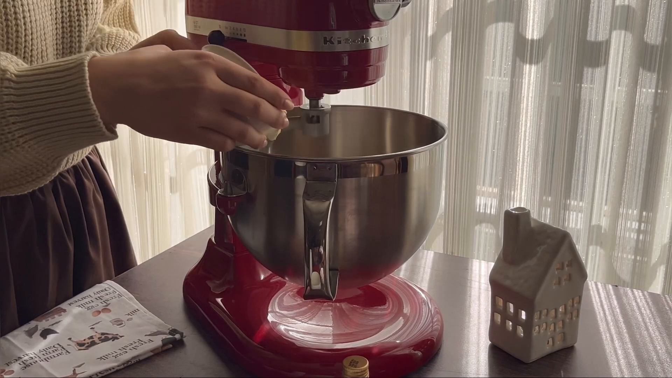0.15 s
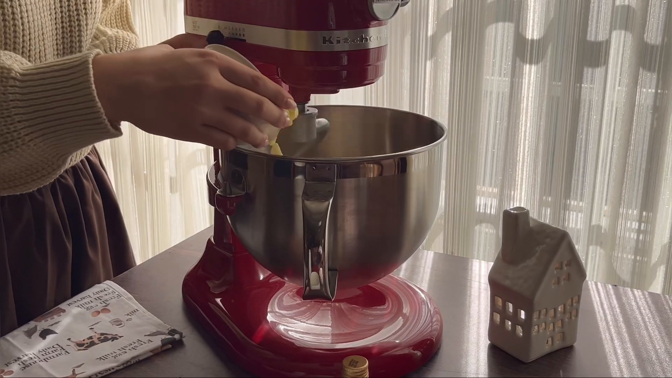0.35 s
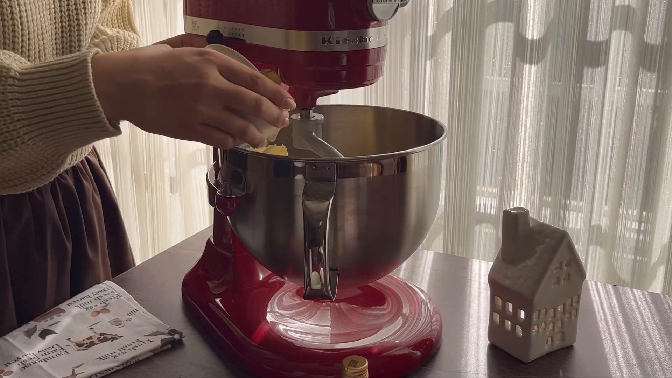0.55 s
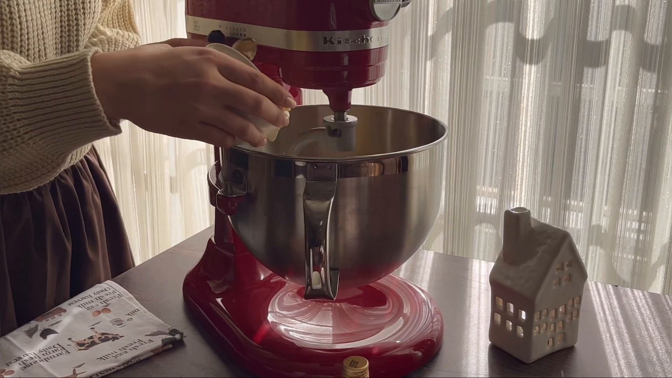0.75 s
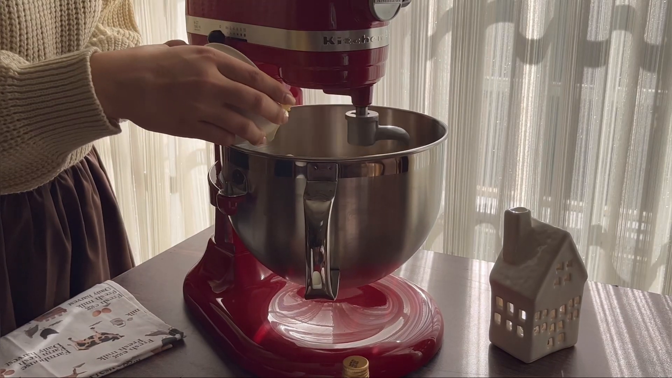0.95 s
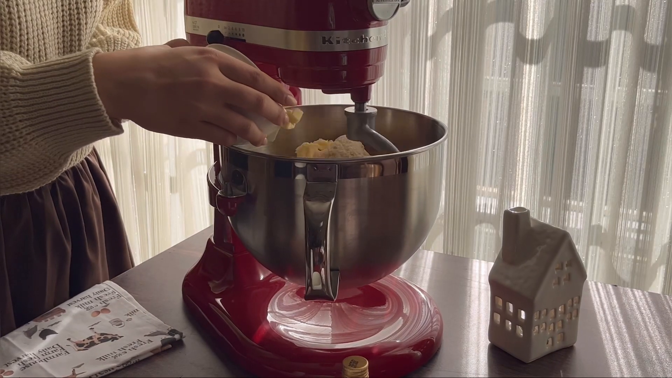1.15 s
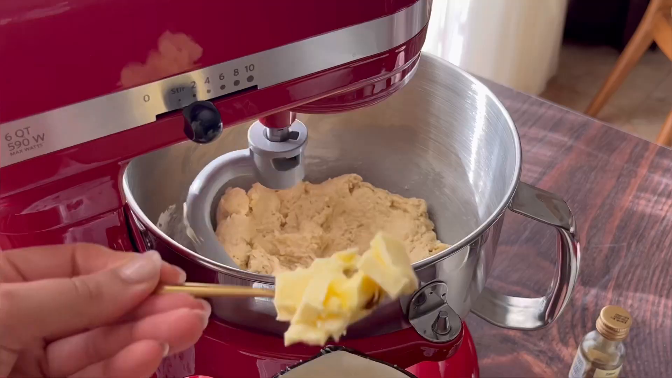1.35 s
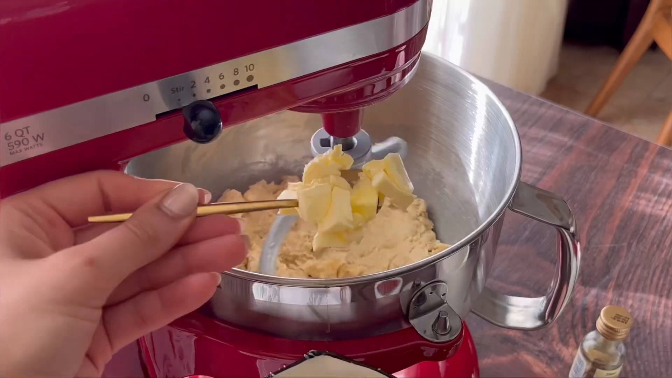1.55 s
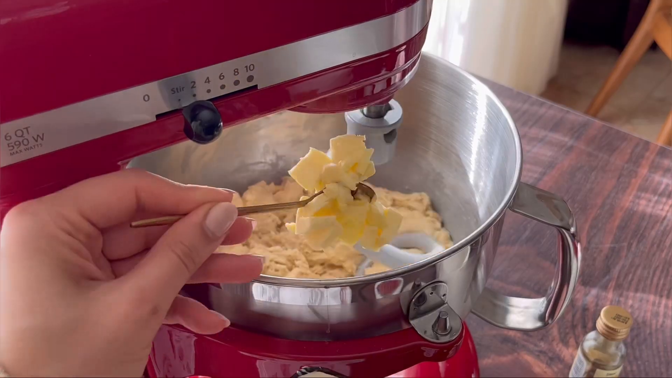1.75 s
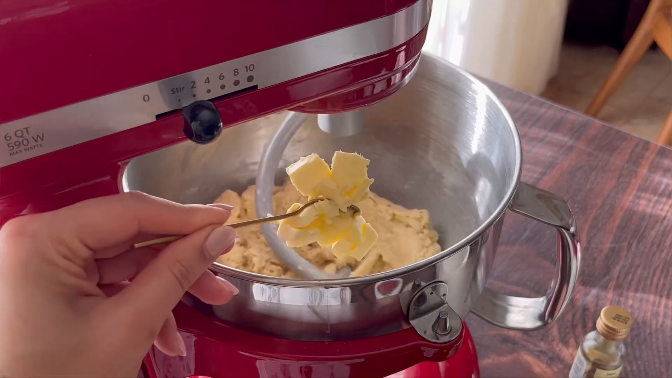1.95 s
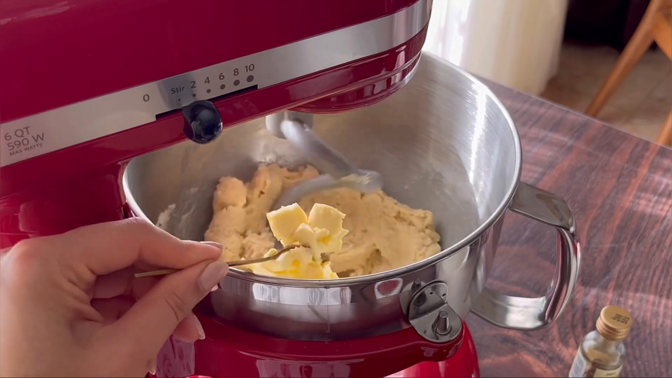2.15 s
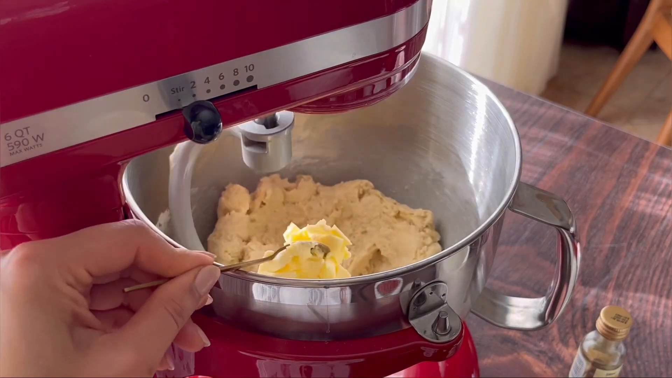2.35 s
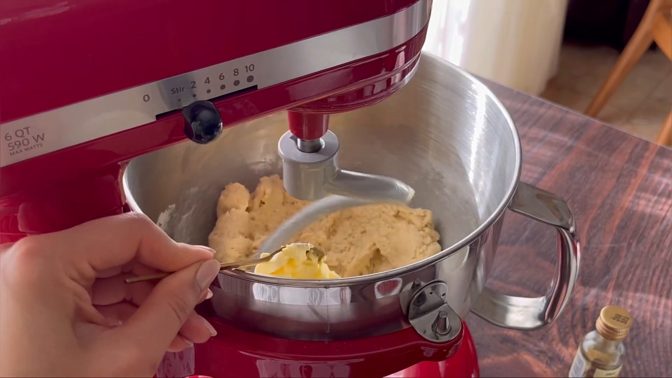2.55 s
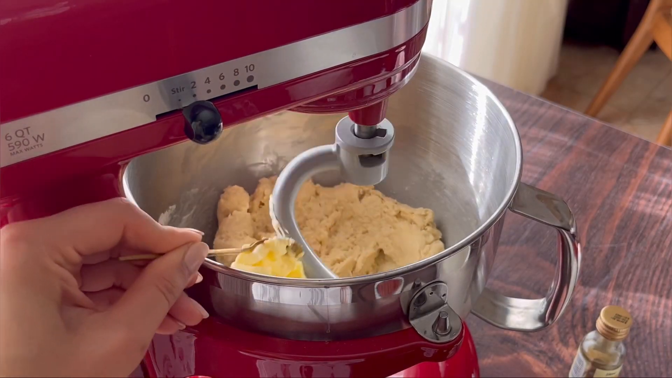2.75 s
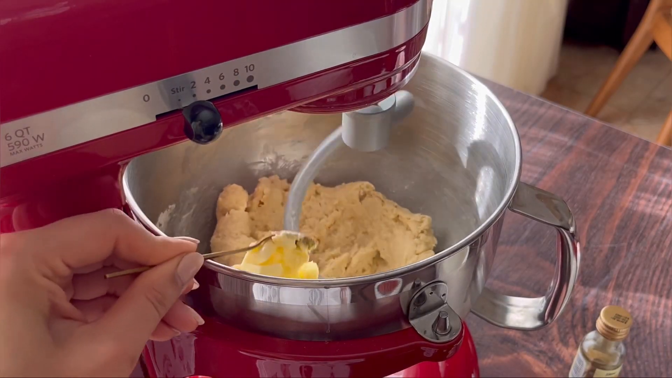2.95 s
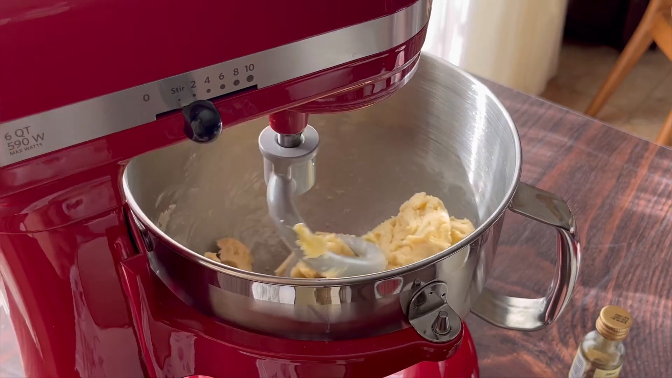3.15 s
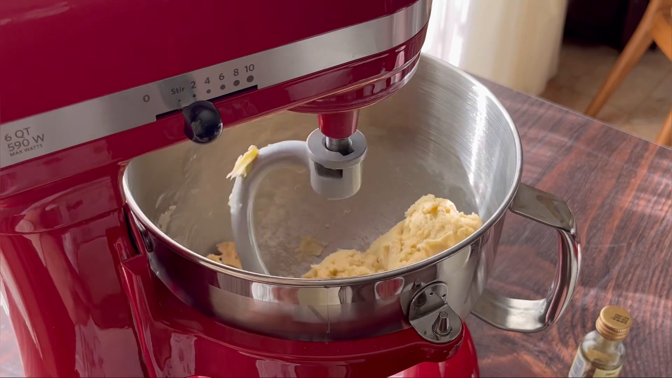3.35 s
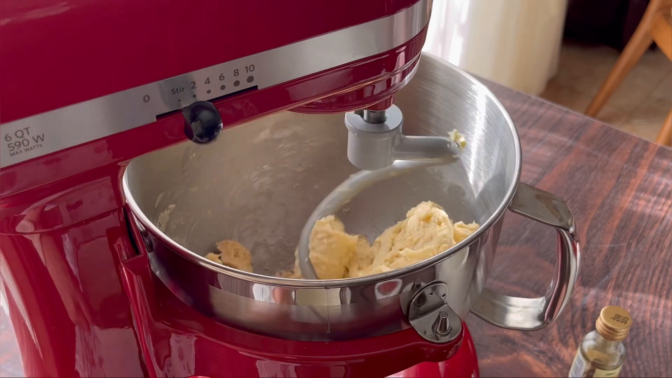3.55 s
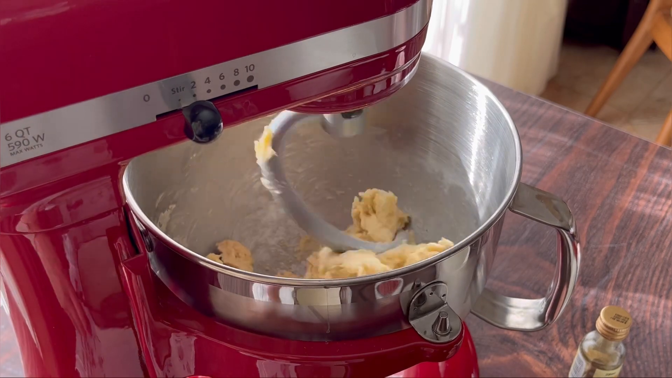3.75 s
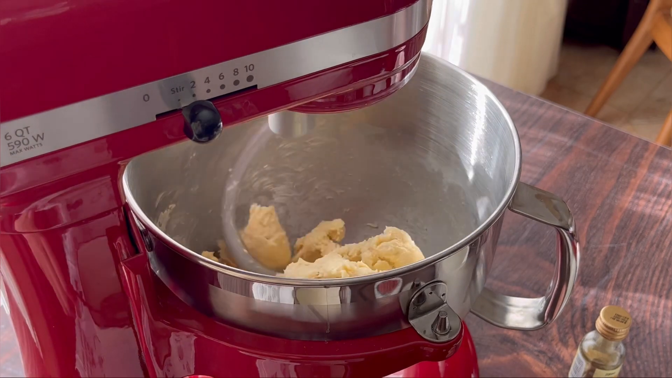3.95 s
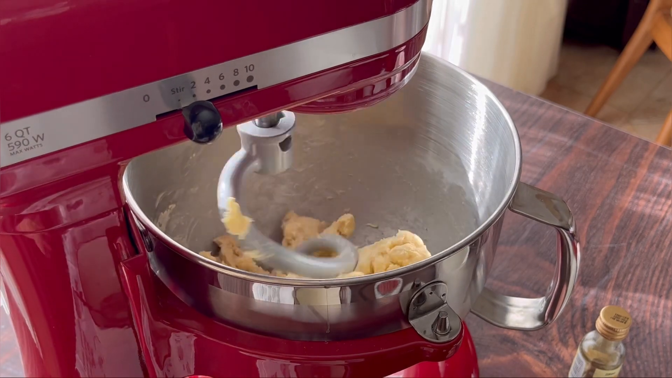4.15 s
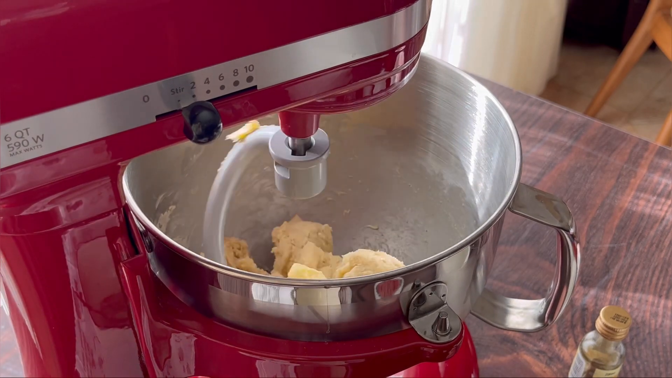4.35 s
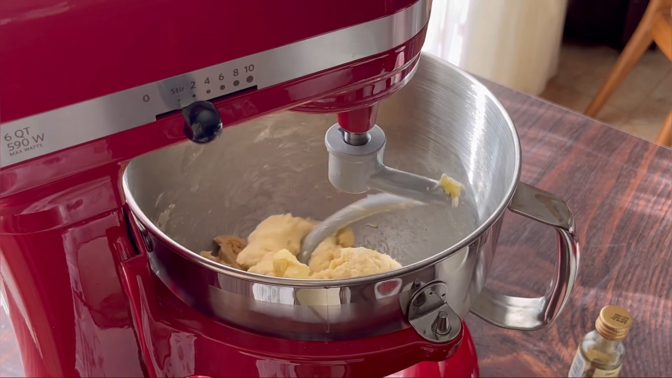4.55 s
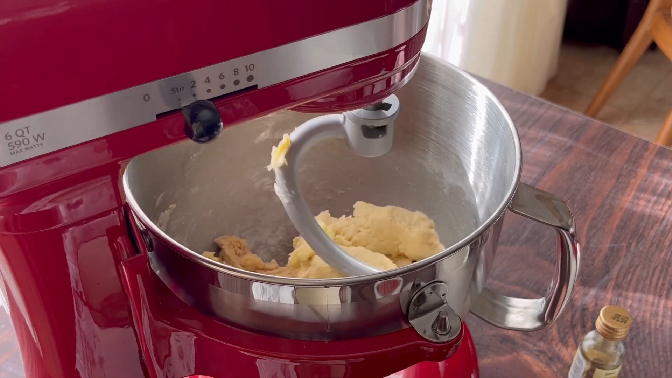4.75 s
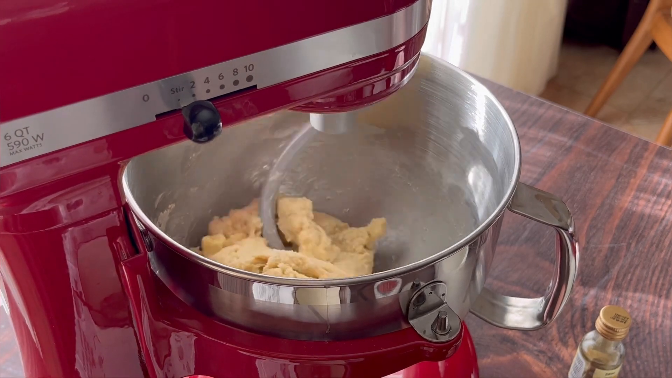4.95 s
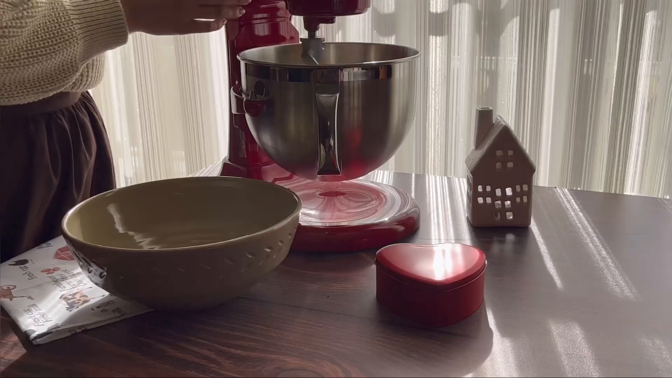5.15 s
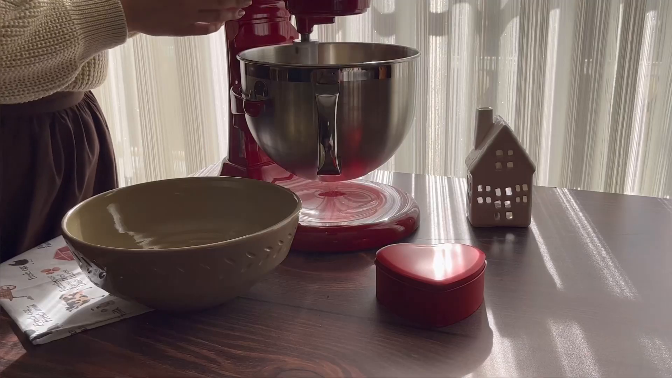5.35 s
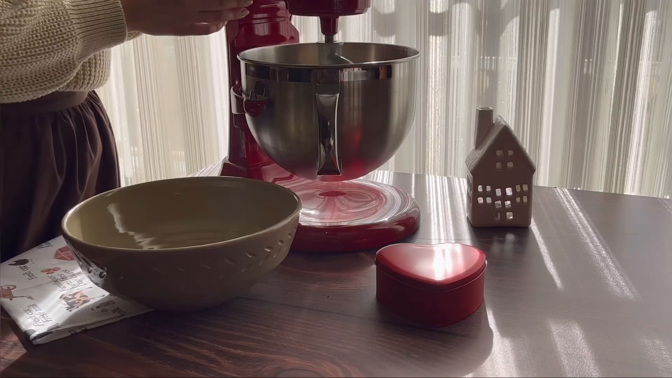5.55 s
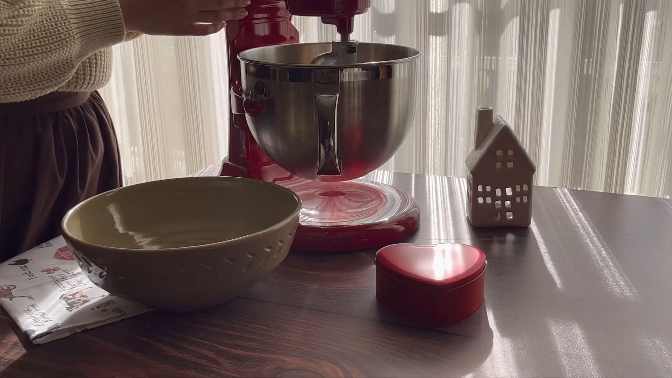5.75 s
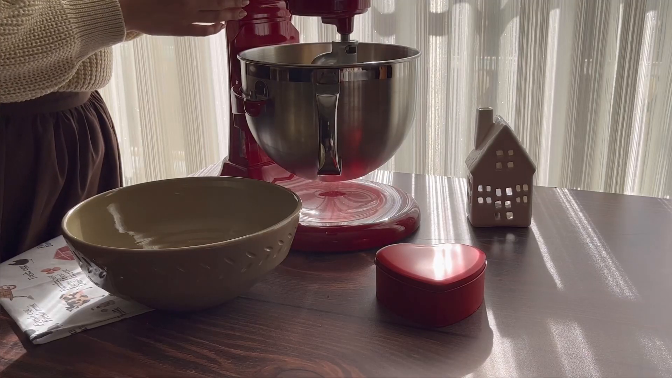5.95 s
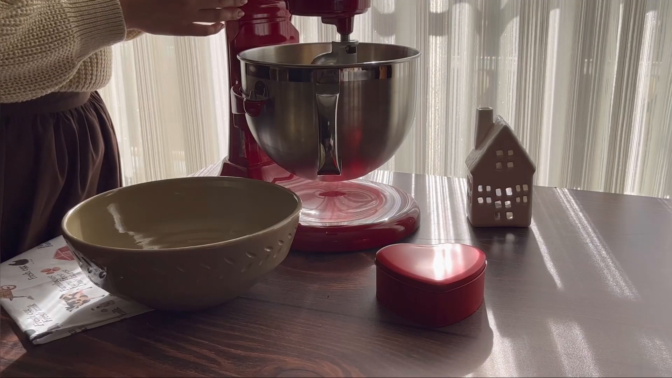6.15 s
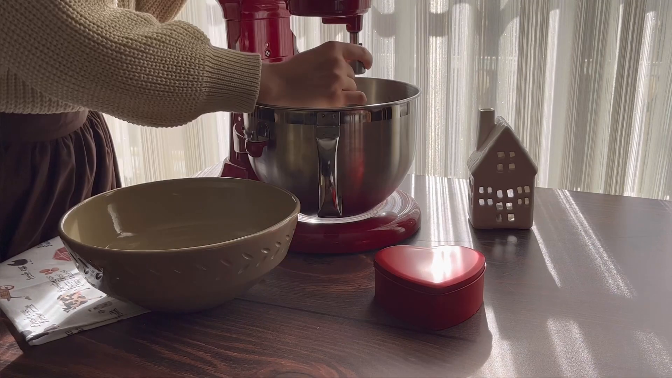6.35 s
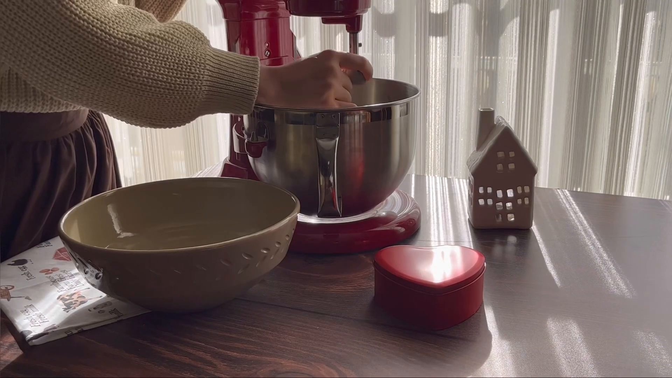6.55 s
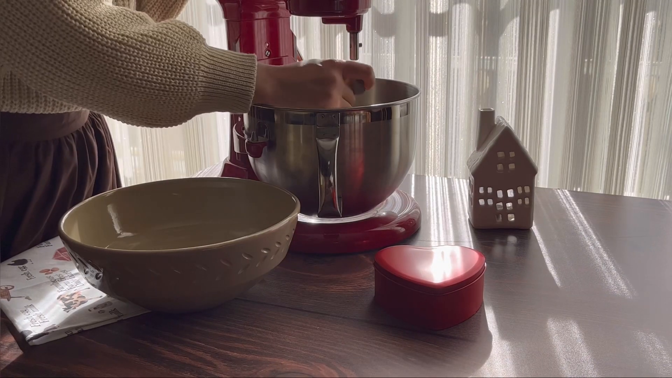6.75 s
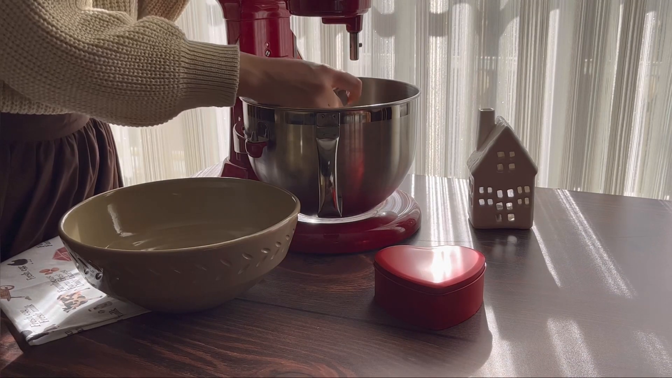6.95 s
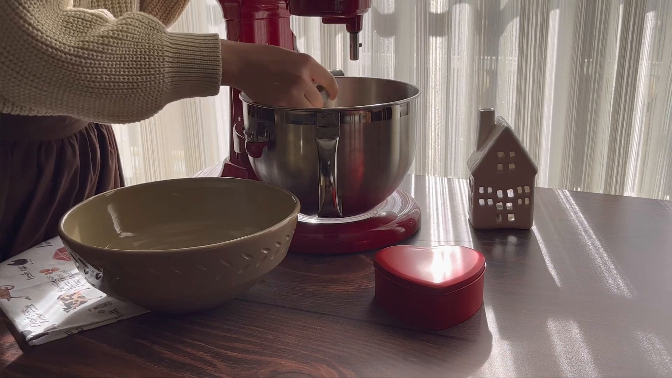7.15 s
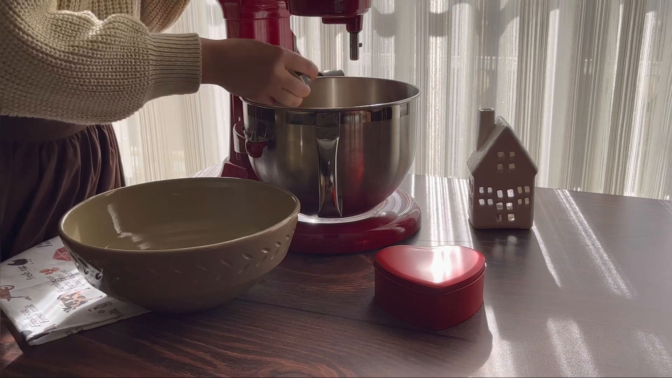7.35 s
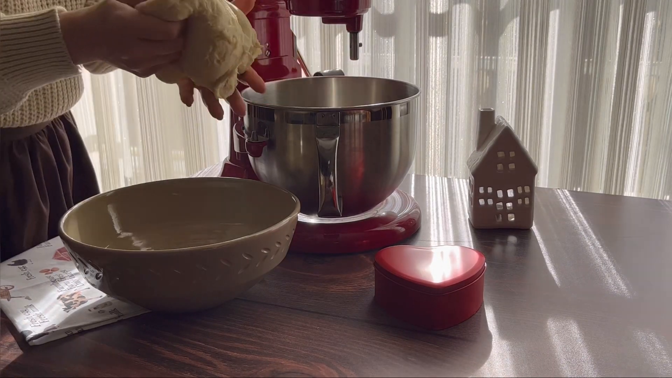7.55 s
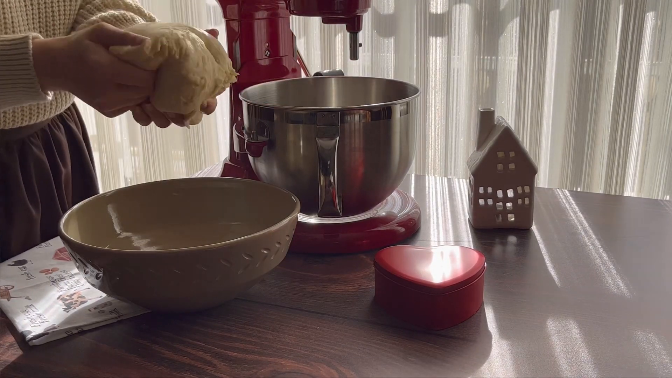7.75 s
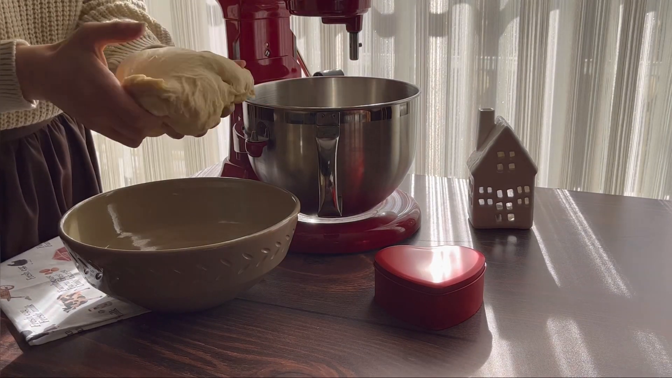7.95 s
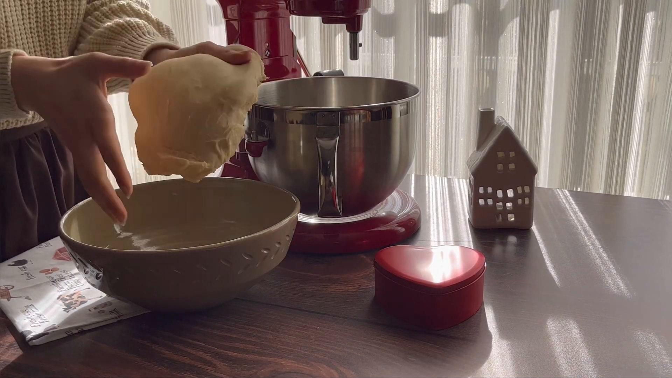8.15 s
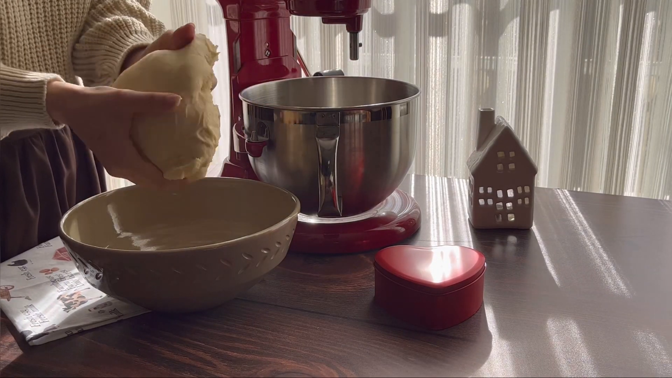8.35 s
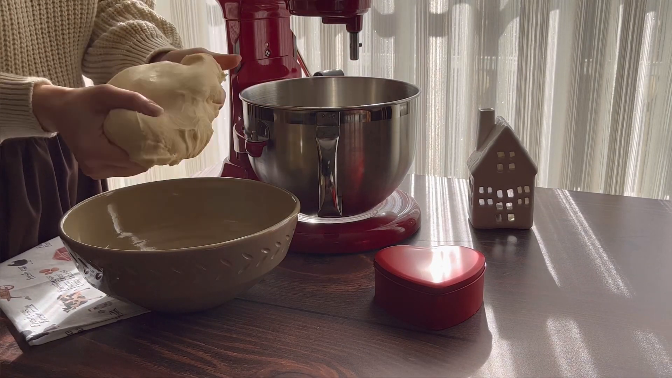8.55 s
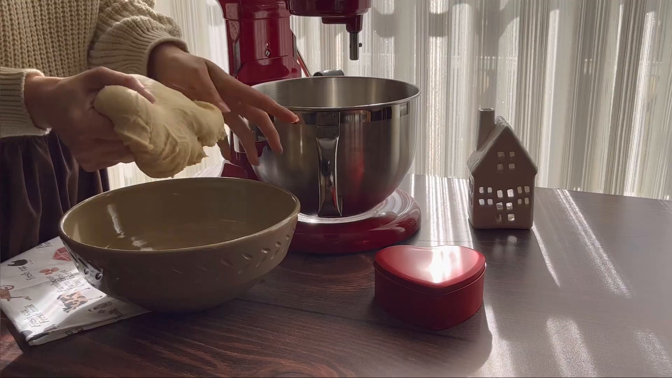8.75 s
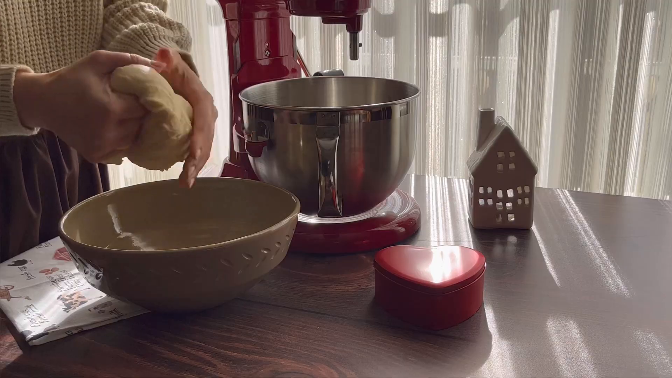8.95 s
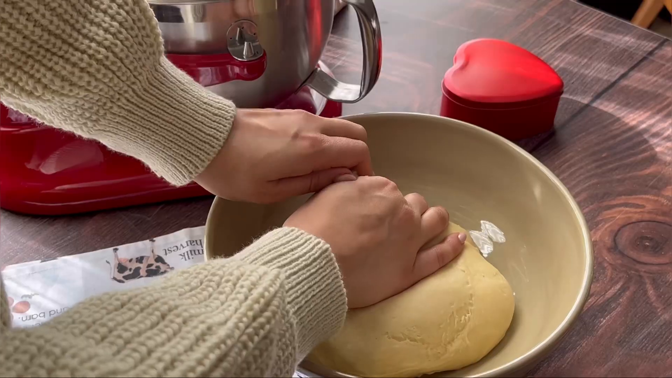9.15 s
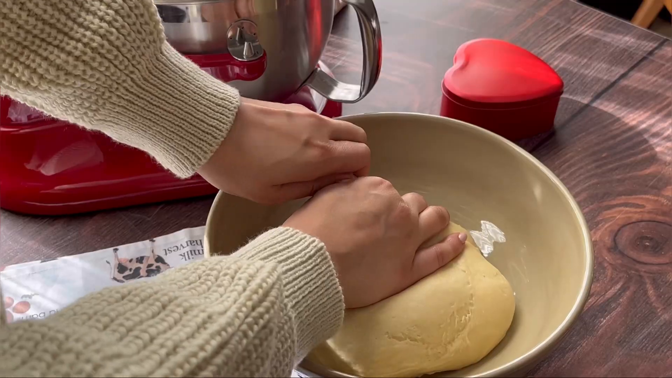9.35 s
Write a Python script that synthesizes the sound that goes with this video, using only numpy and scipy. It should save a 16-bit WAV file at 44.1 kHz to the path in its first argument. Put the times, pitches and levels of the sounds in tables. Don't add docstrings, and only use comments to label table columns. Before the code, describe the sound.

Gear growl of a kneading mixer sags and swells, metal taps ring briefly, a sharp switch snap stops it, then faint sticky dough.

```python
import sys
import numpy as np
from scipy import signal
from scipy.fft import rfft, irfft, next_fast_len
from scipy.io import wavfile
from scipy.ndimage import uniform_filter1d

SR = 44100
rng = np.random.default_rng(int(sys.argv[2]) if len(sys.argv) > 2 else 0)


def int16_out(signal):
    q = np.round(np.clip(np.atleast_2d(signal).T, -1, 1) * 32767)
    wavfile.write(sys.argv[1], SR, q.astype(np.int16))


def nominal_scale(level):
    x = np.asarray(level, float) / 20
    return 10 ** x


N = 414094
T = np.arange(N) / SR
PADDED = next_fast_len(N + SR)
HZ = np.maximum(np.arange(PADDED // 2 + 1) * SR / PADDED, 1)

# start in s, housing, gear noise, brush noise and air noise in dB.
POSITIONS = [
    (0, -44.5, -45.5, -55.5, -59.5),
    (1.36, -34, -46.5, -50, -54.5),
    (3.143, -35, -45.5, -50, -56),
    (5.0, -38, -41, -51.5, -57.5),
]
# field hum in dB, table drone in dB, left minus right in dB, table rumble in dB.
POSITION_LEVELS = [(-54.5, -49.5, 0.5, -56.5), (-38, -55.5, 2, -58.5), (-40, -53.5, 2, -59),
                   (-40, -50, 0, -52.5)]
FREE_MESH_HZ = [523, 530, 552, 548]
# middle in s, sag of the mesh in Hz (negative: it speeds
# up), length in s.
KNEADS = [(.33, 114, .5), (.92, 65, .3), (1.1, 25, .3), (1.26, 55, .22), (1.46, -30, .14), (1.58, 22, .16),
          (1.89, 30, .14), (2.13, 65, .22), (2.25, 20, .1), (2.52, -25, .2), (2.81, 62, .22),
          (3.3, 158, .36), (3.84, 105, .16), (4.13, -60, .26), (4.3, 165, .17), (4.41, 125, .17),
          (4.6, 36, .36), (4.9, 100, .18), (5.04, 148, .24), (5.3, 30, .16), (5.48, 60, .26), (.03, 55, .3),
          (.52, 55, .34), (3.64, -28, .22), (3.94, 45, .2), (4.78, 22, .22)]
# housing strain in dB, treble hush in dB.
KNEAD_STRAIN = [(-4.5, 7.5), (-3.5, 7.5), (6, 10), (9, 2.5), (4.5, -2), (-0.5, -2), (-1.5, 0.5), (-0.5, 4),
                (2.5, -1.5), (-1.5, -2.5), (0.5, 0), (4.5, 3.5), (2, 2), (-0.5, -1), (2.5, 5.5), (0.5, 1.5),
                (-1, 0), (3.5, -1.5), (5.5, 2.5), (-1, 1), (0.5, 0.5), (-5, 4), (5.5, 1), (-1.8, -1.5),
                (-0.5, -2), (0.2, 1.15)]
# frequency in Hz, density in dB per Hz.
MOTOR_HISS = [(20, -41), (50, -24.5), (160, -37), (330, -14), (420, -4.5), (560, -6.5), (730, -22),
              (1050, -19.5), (2240, -28), (3300, -33.5), (5900, -38.5), (9000, -35), (13000, -41.5)]
# frequency in Hz, width in Hz, lift in dB.
HOUSING_MODES = [(419, 48, 8), (495, 140, 7), (795, 86, 7), (1019, 60, 7), (1230, 50, 2.5), (1352, 85, 9),
                 (1496, 60, 6.5), (1795, 110, 8), (2920, 120, 2.5), (3850, 110, 6), (4450, 520, 7.5),
                 (4950, 200, 6), (5428, 300, 1)]
# multiple of the mesh frequency, level in dB. The 0.84 row is a
MESH_ORDERS = [(.84, -15), (1, -2.5), (1.32, -18.5), (1.6, -18), (2, -10), (2.5, -21), (3, -19), (4, -23)]
# multiple of the mesh frequency, level in dB.
SLOT_ORDERS = [(10, -5), (11, -3.5), (11.5, -12), (12, -2.5), (13, -2), (14, -10.5)]
# start in s, end in s, level over the brush noise in dB.
WHINES = [(.06, .18, -10), (.5, .9, -6), (1.74, 2.33, -5), (2.33, 3.25, -12), (3.38, 4.2, -8),
          (4.42, 5.0, -7), (5.08, 5.28, -8), (5.5, 5.7, -8)]
# time in s, frequency in Hz, level in dB.
GROAN = [(.62, 442.6, -83), (.7, 422.6, -42.5), (.88, 350, -48.5), (1.0, 330, -52), (1.15, 300, -50),
         (1.33, 290, -47), (1.36, 281, -72)]
# time in s, level in dB, decay time t60 in s.
BACKLASH = [(.5, -52, 0.026), (1.5, -44.5, 0.9), (3.465, -32, 0.03), (4.07, -30.5, 0.19),
            (4.122, -31, 0.066), (4.454, -40, 0.035), (2.099, -38.5, .09), (2.791, -41.5, .08),
            (4.901, -37.5, .07)]
# time in s, level in dB.
SHUDDER = [(0, -57), (.15, -47), (.4, -49), (.6, -56), (.8, -89)]
# start in s, end in s, first Hz, last Hz, level in dB.
MOANS = [(.37, .71, 262, 268, -49), (.3, .45, 655, 705, -41), (.07, .2, 660, 690, -46),
         (1.03, 1.22, 445, 418, -40), (.14, .31, 930, 800, -44), (.28, .43, 795, 812, -44),
         (.14, .3, 465, 385, -36), (.48, .76, 455, 540, -37), (.2, .47, 490, 522, -40),
         (.63, .83, 405, 432, -38), (.8, 1.03, 420, 378, -41), (.98, 1.21, 522, 490, -39),
         (1.23, 1.38, 418, 452, -38), (.78, 1.02, 352, 328, -45), (0, .15, 420, 475, -39),
         (2.27, 2.57, 437, 456, -38), (.45, .71, 575, 642, -47), (4.21, 4.32, 465, 388, -33),
         (4.83, 4.96, 430, 470, -34)]
# middle in s, first Hz, last Hz, level in dB, length in s.
FLARES = [(.19, 1340, 1340, -42.5, 0.08), (.62, 990, 990, -55, 0.13), (0.781, 1030, 1020, -54, 0.11),
          (1.56, 1520, 1530, -45, 0.084), (1.69, 1740, 1710, -49, .07), (2.118, 1410, 1414, -44.5, 0.076),
          (2.12, 1870, 1830, -44, .08), (2.54, 1780, 1766, -47, 0.11), (2.53, 1520, 1536, -45, 0.071),
          (2.81, 1830, 1890, -49, .09), (2.821, 1405, 1420, -49, .09), (3.25, 809, 767, -35, 0.074),
          (3.4, 1285, 1370, -45, .07), (3.41, 1800, 1870, -50, 0.054), (3.623, 1720, 1720, -43, 0.065),
          (3.791, 1053, 1020, -43.5, 0.059), (3.97, 1057, 1075, -42, 0.065),
          (4.087, 1004, 1023, -41, 0.074), (4.16, 1810, 1776, -43.5, 0.12), (4.146, 1230, 1230, -44, 0.047),
          (4.242, 1044, 1036, -45, 0.054), (4.297, 775, 740, -40, .08), (4.39, 820, 833, -39.5, 0.075),
          (4.446, 1114, 1100, -42, 0.059), (4.57, 1503, 1510, -43.5, 0.055), (4.81, 1530, 1507, -45, 0.076),
          (4.934, 1920, 1880, -44, .06), (5.05, 781, 828, -40.5, .12), (5.241, 1050, 1063, -47, 0.17),
          (5.397, 1747, 1726, -45.5, 0.15), (5.52, 1720, 1728, -45.5, 0.077), (3.47, 512, 540, -31, .05),
          (1.97, 1020, 1065, -42, .2), (2.36, 1050, 1060, -42, .2), (2.47, 845, 860, -46, .2),
          (1.95, 525, 535, -36, .12), (2.42, 540, 545, -35, .1), (2.53, 555, 560, -35, .1)]
# time in s, peak, low ring, top ring and second mode in dB.
TAPS = [
    (0.932, -38, -2.5, -5.5, 7.5),
    (2.3287, -18, -13.5, -15, 1),
    (2.527, -17.5, -12, -13, -6.5),
    (2.6881, -18, -8.5, -8.5, 0),
    (2.8834, -19, -16.5, -17, -2),
    (3.051, -15.5, -19.5, -18, -2.5),
    (3.58, -37, -8.5, -5, 0),
]
# frequency in Hz, level in dB, decay time t60 in s.
BOWL_MODES = [(1010, 16.5, 0.029), (2013, -1, 0.068), (3660, -12, 0.044), (3892, -15.5, 0.093),
              (4170, -9.5, 0.083), (4630, -8.5, 0.052), (5070, -10.5, 0.053), (5444, -23.5, .04),
              (5940, -11.5, 0.056), (6684, -4, 0.028), (7326, -4, .025), (10450, 12, 0.01),
              (10900, -17.5, .04), (12500, 0.5, 0.023)]
# time in s, peak in dB.
SWITCH_HITS = [
    (5.618, -0.5),
    (5.6203, -9.5),
    (5.624, -22),
]
# frequency in Hz, density in dB per Hz.
SWITCH_COLOUR = [(250, -21.5), (600, -14), (1900, -15), (3200, -14.5), (5000, -4), (7200, -11.5),
                 (9400, -3.5), (13000, -9.5)]
# frequency in Hz, level in dB, decay time t60 in s.
SWITCH_MODES = [(4500, -7, .005), (5150, -3, .005), (6300, -7, .004), (10200, -6, .004), (12504, -10, .004)]
# time in s, scrape level in dB.
HOOK_SCRAPE = [(6.3, -97), (6.318, -60), (6.372, -105.5), (6.476, -27), (6.548, -59), (6.714, -57),
               (6.734, -69), (6.85, -91)]
# time in s, peak in dB, bright part in dB.
HOOK_KNOCKS = [(6.316, -59, -30), (6.39, -54, -27), (6.432, -50, -30), (6.447, -33, -28),
               (6.456, -35.5, -11.5), (6.464, -30.5, -14), (6.473, -46, -18), (6.482, -35, -27),
               (6.6255, -36.5, -40), (6.686, -42.5, -48), (6.703, -45.5, -44)]
# frequency in Hz, level in dB, decay time t60 in s.
HOOK_MODES = [(624, -17, 0.054), (900, 3, 0.049), (1055, 0.5, 0.059), (1160, 3.5, 0.025), (1340, 0, 0.02),
              (1610, -7, 0.026), (2020, 0, 0.02), (2124, 2, 0.02), (2700, -16, 0.068), (3410, -10, 0.032),
              (4630, -15, 0.035), (5620, -12, 0.04), (5650, -19, .04), (6600, -35, 0.037)]
# time in s, level in dB, frequency in Hz.
SLEEVE_BRUSHES = [(6.85, -79, 6400), (6.855, -82, 3900), (6.93, -81, 6300), (6.99, -74, 3750),
                  (7.0, -79, 6100), (7.03, -82, 4000)]
# peak in s, peel in dB, squelch in dB, rise in s, fall in s.
PEELS = [
    (8.056, -69, -89, .1, .03),
    (8.372, -72.5, -86, 0.02, 0.092),
    (8.704, -68.5, -79, 0.072, 0.032),
    (8.898, -96, -71, 0.013, 0.06),
    (9.13, -81, -70, 0.19, 0.18),
    (9.39, -78, -85.5, .12, .1),
]
# time in s, peak in dB, frequency in
# Hz.
POPS = [(6.227, -66, 1450), (6.3155, -59, 3600), (6.328, -59, 2700), (6.34, -62, 1900), (6.697, -54, 2660),
        (6.3151, -50, 1290), (6.688, -55, 2670), (8.0341, -59, 4950), (8.05, -64, 5100),
        (8.3747, -61.5, 1898), (8.691, -60, 1790), (8.692, -63.5, 3000), (8.702, -59, 4890),
        (8.8992, -51, 1408)]
# time in s, peak in dB, frequency in Hz, decay time t60 in s.
THUMPS = [(3.358, -27.5, 52, .23), (3.355, -27, 100, .1), (5.03, -28, 56, .03), (6.498, -36.5, 235, .12),
          (6.7015, -43, 455, .08), (6.687, -46, 860, .07), (6.701, -45, 820, .07), (6.6265, -44, 150, .03),
          (8.718, -43, 108, .14)]
# frequency in Hz, decay time t60 in s.
REVERBERATION = [(120, 1), (400, 1), (1000, .5), (2500, .45), (5500, 0.382), (11000, 0.089)]
# frequency in Hz, lead of the left in radians.
PORT_PHASE = [(0, 0), (200, .1), (520, 0.9), (1290, 0.9), (1720, .3), (2930, .8), (4740, .7), (5600, -.6),
              (6630, -1.1), (7670, -2.8), (9470, -3.8), (11100, -5.95), (12200, -6.4), (12900, -6.9),
              (13700, -8.2), (16200, -8.6)]
# frequency in Hz, left minus right in dB.
PORT_BALANCE = [(120, -.6), (380, .6), (700, 1.2), (1290, -2), (2380, 1), (4400, 4), (8120, -1)]
# frequency in Hz, density in dB per Hz.
ROOM_TONE = [(15, -44.5), (37, -15.5), (60, -11.5), (110, -6), (266, -14), (450, -17), (560, -23.5),
             (700, -31.5), (1500, -34.5), (3000, -42), (9500, -52), (11500, -41), (13300, -35),
             (14500, -57)]
# frequency in Hz, likeness from 0 to 1.
COHERENCE = [(60, 0.95), (290, 0.84), (640, 0.7), (1400, 0.3), (7000, 0.1), (13000, 0.39)]
# time in s, level in dB.
RUMBLE = [(0, -48.5), (.7, -48.5), (1.1, -52), (2.9, -50.5), (3.3, -49), (4.9, -50.5), (5.05, -46),
          (5.5, -48.5), (6.15, -61), (6.59, -50), (7.01, -62), (7.88, -60), (8.15, -60.5), (8.91, -56),
          (9.39, -55.5)]
# frequency in Hz, level in dB.
FRIDGE_LINES = [(48.4, -66.5), (96.9, -68.5), (489.9, -75)]
# frequency in Hz, gain in dB.
MICROPHONE = [(7500, -0.5), (7850, -18), (8750, -19), (9150, -1), (14300, -3), (15000, -9), (16400, -7),
              (16700, -40)]
# time in s, fade-in in s.
SCENE_CHANGES = [(3.142, 0.016), (4.994, 0.025), (6.23, 0.018), (7.41, 0.027), (9.0, 0.029)]

OFF_S = 5.652
DIG_FLAT = 1.35
HANDS_S = 7.5


def curves(table):
    s, *columns = np.transpose(table)
    return [np.interp(T, s, c) for c in columns]


def over_hz(points):
    hz, value = np.transpose(points)
    return np.interp(np.log(HZ), np.log(np.maximum(hz, 1)), value)


def colour(x, gain):
    return irfft(rfft(x, PADDED) * gain, PADDED)[..., :N]


def band(lo_hz, hi_hz):
    return 1 / np.sqrt((1 + (lo_hz / HZ) ** 8) * (1 + (HZ / hi_hz) ** 8))


def unit(x):
    return x / np.sqrt(np.mean(x ** 2))


def walk(rate):
    k = int(SR / rate)
    steps = np.repeat(rng.standard_normal(N // k + 1), k)
    return unit(uniform_filter1d(uniform_filter1d(steps, k), k)[:N])


def ring(x, hz, t60):
    pole = np.exp(2j * np.pi * hz / SR - np.log(1000) / (max(t60, .002) * SR))
    return signal.lfilter([1], [1, -pole], x).imag


def blow(s, db):
    return nominal_scale(db) * (np.arange(N) == int(s * SR))


def burst(s, db, t60, rise=.0001):
    out, start = np.zeros(N), int(s * SR)
    t = T[:8192]
    piece = rng.standard_normal(8192) * 1000 ** (-t / t60) * (1 - np.exp(-t / rise))
    out[start:start + 8192] = nominal_scale(db) * piece[:N - start]
    return out


def bump(s, length):
    phase = np.pi * np.clip((T - s) / length, -.5, .5)
    return np.minimum(DIG_FLAT * np.cos(phase) ** 2, 1)


def mixer():
    (mesh_hz, housing_db, gear_db, brush_db, air_db,
     whine_db, hum_db, drone_db, pan_db, rumble_db) = controls()
    rotor = np.cumsum(mesh_hz * (1 + .008 * walk(50))) / SR
    turns = rotor + .05 * walk(70)
    lift = 1 + sum((nominal_scale(db) - 1) / (1 + (2 * (HZ - hz) / width) ** 2) for hz, width, db in HOUSING_MODES)
    mains = np.cos(2 * np.pi * 100 * T)
    noise = friction_noise(turns, mains, lift)

    def part(lo_hz, hi_hz):
        return unit(colour(noise, band(lo_hz, hi_hz))) * nominal_scale(1.9 * walk(14))

    shaft = np.sin(np.pi * turns) + nominal_scale(-5.0) * np.sin(3 * np.pi * turns)
    shaft = nominal_scale(3 * walk(24.8) - 6.0) * shaft
    dry = nominal_scale(housing_db) * (gear_teeth(turns, mains, lift) + nominal_scale(-15.5) * part(290, 580))
    dry = dry + nominal_scale(hum_db + 0.5) * field_hum()
    dry = dry + nominal_scale(gear_db) * part(700, 2500)
    dry = dry + nominal_scale(air_db) * part(9700, 14200)
    dry = dry + nominal_scale(brush_db) * (part(2500, 7300) + nominal_scale(whine_db) * rotor_whine(rotor))
    dry = dry + nominal_scale(curves(SHUDDER)[0]) * part(600, 920)
    dry = dry + nominal_scale(rumble_db) * part(25, 240)
    dry = dry + nominal_scale(drone_db) * (part(190, 350) + shaft)
    dry = dry + groan() + backlash(lift) + moans()

    after = np.maximum(T - OFF_S, 0)
    coast = np.exp(-after / 0.02) + nominal_scale(-12.5) * (T > OFF_S) * np.exp(-after / 0.11)
    rundown = nominal_scale(-45.5) * (T > OFF_S) * np.exp(-after / 0.077) * part(330, 620)
    return (dry * coast + rundown) * nominal_scale(np.array([pan_db, -pan_db]) / 2)


def by_position(rows):
    place = np.searchsorted([row[0] for row in POSITIONS], T, side="right") - 1
    return uniform_filter1d(np.array(rows, float)[place].T, 900, axis=1)


def controls():
    _, housing_db, gear_db, brush_db, air_db = by_position(POSITIONS)
    hum_db, drone_db, pan_db, rumble_db = by_position(POSITION_LEVELS)
    loads = [np.outer([hz, *dbs], bump(s, length)) for (s, hz, length), dbs in zip(KNEADS, KNEAD_STRAIN)]
    sag_hz, strain_db, hush_db = sum(loads)

    def drift():
        return 1.15 * walk(7)

    free_hz = by_position(np.transpose([FREE_MESH_HZ]))[0]
    mesh_hz = (free_hz - sag_hz) * (1 + .002 * walk(12))
    shown = sum(nominal_scale(db) * (T > a) * (T < b) for a, b, db in WHINES)
    whine_db = 20 * np.log10(.07 + uniform_filter1d(shown, 4000))
    gear_db = gear_db - .3 * hush_db + drift()
    brush_db = brush_db - 0.36 * hush_db
    return (mesh_hz, housing_db + strain_db + drift(), gear_db, brush_db, air_db - hush_db,
            whine_db, hum_db + drift(), drone_db + drift(), pan_db + .5 * walk(6.3), rumble_db)


def gear_teeth(turns, mains, lift):
    teeth = 0
    for k, db in MESH_ORDERS:
        level_db = db + (.8 + 1.3 * k) * walk(30) - k + 1
        teeth = teeth + nominal_scale(level_db) * np.sin(2 * np.pi * k * turns)
    return colour(teeth * (1 + 0.085 * mains), lift) / nominal_scale(7.0)


def rotor_whine(rotor):
    slots = sum(nominal_scale(db + 4.5 * walk(70)) * np.sin(2 * np.pi * k * rotor) for k, db in SLOT_ORDERS)
    return unit(colour(slots, 1 / (1 + ((HZ - 5780) / 320) ** 4)))


def field_hum():
    throb = 1 + .65 * np.cos(2 * np.pi * 8.85 * (T - 2.25))
    lines = np.sin(2 * np.pi * 399.7 * T) + nominal_scale(-21) * np.sin(2 * np.pi * 199.9 * T)
    return nominal_scale(2.8 * walk(35) - .5) * throb * lines


def friction_noise(turns, mains, lift):
    beat = (1 + .3 * np.cos(2 * np.pi * turns)) * (1 + .04 * mains)
    panels = unit(panel_rattle(650., 7000., count=30, width=70., patchy_db=5.5))
    shaken = rng.standard_normal(N) + nominal_scale(-4.5) * panels
    return colour(beat * shaken, nominal_scale(over_hz(MOTOR_HISS)) * lift)


def panel_rattle(lo_hz, hi_hz, count, width, patchy_db):
    shake = rng.standard_normal(N)
    places = np.geomspace(lo_hz, hi_hz, count) * (1 + 0.017 * rng.standard_normal(count))
    return sum(unit(ring(nominal_scale(patchy_db * walk(18)) * shake, hz, 2.0 / width)) * np.sqrt(hz)
               for hz in places)


def groan():
    hz, db = curves(GROAN)
    return nominal_scale(db + 4.7 * walk(35)) * np.sin(2 * np.pi * np.cumsum(hz) / SR)


def backlash(lift):
    knocks = sum(burst(s, db, t60, rise=0.0032) for s, db, t60 in BACKLASH)
    return colour(knocks, lift * band(650, 4400))


def moans():
    rows = MOANS + [(s - length / 2, s + length / 2, hz, to_hz, db) for s, hz, to_hz, db, length in FLARES]
    out = np.zeros(N)
    for a, b, hz, to_hz, db in rows:
        span = slice(int(a * SR), int(b * SR))
        glide = np.cumsum(np.interp(T[span], [a, b], [hz, to_hz])) / SR
        swell = nominal_scale(db + 2.2 * walk(35.1)) * bump((a + b) / 2, b - a)
        out[span] += swell[span] * np.sin(2 * np.pi * glide)
    return out


def spoon():
    out = 0
    for s, db, low_db, top_db, second_db in TAPS:
        start = int(s * SR)
        spot = rng.standard_normal((len(BOWL_MODES), 2))
        for (hz, mode_db, t60), (strong, tune) in zip(BOWL_MODES, spot):
            size_db = db + mode_db - 1.5 + low_db * (hz < 3000) + top_db * (hz > 9000)
            size_db = size_db + second_db * (1500 < hz < 3000) + 2.5 * strong * (3000 < hz < 9000)
            swell = (1 - np.exp(-T[:8192] * hz / 2.7)) ** 2
            tone = ring(blow(0, size_db)[:8192], hz * (1 + .008 * tune), t60)
            out = out + np.pad(swell * tone, (start, N))[:N]
        spread = band(4900, 9500) + nominal_scale(top_db + 6.5) * band(7500, 17000)
        out = out + nominal_scale(4.0) * colour(burst(s, db, 0.024, rise=.0006), spread)
        body = burst(s, db + low_db + second_db / 2 + 3, .05, rise=0.00298)
        out = out + colour(body, band(800, 3500))
    return out


def switch():
    gain = nominal_scale(over_hz(SWITCH_COLOUR))
    snap = colour(sum(burst(s, db + 6.5, 0.006) for s, db in SWITCH_HITS), gain * band(2300, 20000))
    push = sum(blow(s, db) for s, db in SWITCH_HITS)
    snap = snap + sum(nominal_scale(db - 6.0) * ring(push, hz, t60) for hz, db, t60 in SWITCH_MODES)
    seat = burst(5.6225, -17, 0.066, rise=0.0012)
    return snap + colour(seat, band(450, 2600) + nominal_scale(6.5) * band(500, 900))


def hook():
    sliding = (T > HOOK_SCRAPE[0][0]) * (T < HOOK_SCRAPE[-1][0])
    scrape = nominal_scale(curves(HOOK_SCRAPE)[0] - 7.0) * sliding * rng.standard_normal(N)
    knocks = sum(burst(s, db, 0.045, rise=0.0049) for s, db, _ in HOOK_KNOCKS)
    push = colour(scrape + knocks, band(300, 4100))
    bright = sum(burst(s, db + bright_db, 0.048, rise=0.0051) for s, db, bright_db in HOOK_KNOCKS)
    free_s = 6.47
    shiver = (T > free_s) * 1000 ** (-np.maximum(T - free_s, 0) / 0.36)
    jangle = nominal_scale(-51.5) * shiver * rng.standard_normal(N)
    body = 0
    for hz, db, t60 in HOOK_MODES:
        force = push if hz < 3000 else nominal_scale(13.0) * (bright + jangle)
        body = body + nominal_scale(db - 27.0) * ring(force, hz, t60)
    sleeve = sum(colour(burst(s, db, .15, rise=.01), band(hz / 1.03, hz * 1.03) ** 3)
                 for s, db, hz in SLEEVE_BRUSHES)
    crack = nominal_scale(11.0) * colour(bright, band(2470, 3800) + nominal_scale(0.5) * band(4200, 12900))
    scuff = nominal_scale(-5.5) * colour(push, band(710, 2550))
    return colour(body, band(570, 8900)) + scuff + crack + nominal_scale(28.0) * sleeve


def dough():
    peel_db, squelch_db = peeling()
    cracks = unit(rng.standard_normal(N) * nominal_scale(2.0 * rng.exponential(size=N))) * (T > HANDS_S)

    def part(lo_hz, hi_hz):
        return unit(colour(cracks, band(lo_hz, hi_hz)))

    out = nominal_scale(peel_db - 14.0) * (part(2300, 7500) + 0.47 * part(4600, 5500))
    out = out + nominal_scale(np.maximum(peel_db, -87)) * part(12600, 16000)
    out = out + nominal_scale(squelch_db - 7.5) * part(650, 2130)
    for s, db, hz in POPS:
        pop = burst(s, db, 0.02 if hz > 1500 else .007)
        out = out + nominal_scale(-16.0) * ring(pop, hz, 0.012)
        out = out + nominal_scale(3.0 - 17 * (hz > 1500)) * colour(pop, band(1000, 3200))
    for s, db, hz, t60 in THUMPS:
        push = uniform_filter1d(blow(s, db), int(SR / hz / 2))
        out = out + nominal_scale(1.0) * colour(ring(push, hz, t60), band(33, 2000))
    return out


def peeling():
    def shape(s, rise, fall):
        return -22 * np.maximum((s - T) / rise, (T - s) / fall)

    peel = np.max([db + shape(s, rise, fall) for s, db, _, rise, fall in PEELS], axis=0)
    squelch = np.max([db + shape(s, rise, fall) for s, _, db, rise, fall in PEELS], axis=0)
    return np.maximum(peel, -94), np.maximum(squelch, -92)


def kitchen(x):
    answer = 0
    for hz, t60 in REVERBERATION:
        own = min(hz / 700, 1)
        tail = own * rng.standard_normal((2, N)) + (1 - own) * rng.standard_normal(N)
        tail = tail * 1000 ** (-T / t60) * (1 - np.exp(-T / 0.002))
        answer = answer + colour(tail, band(hz / 1.7, hz * 1.355)) / np.sqrt(t60 * SR)
    return colour(answer, rfft(x, PADDED))


def room_tone():
    level_db = curves(RUMBLE)[0]
    lift_db = 0.46 * (level_db + 64.5) * (T > OFF_S) - 3.0
    like = np.clip(over_hz(COHERENCE), 0, 1)
    mid, side = rng.standard_normal((2, N))
    gain = nominal_scale(over_hz(ROOM_TONE))
    common = colour(mid, gain * np.sqrt(1 + like))
    tone = unit(common + np.outer([1, -1], colour(side, gain * np.sqrt(1 - like))))
    low = colour(tone, band(15, 800.3))
    lines = sum(nominal_scale(db + 1.0 + 2.2 * walk(16)) * np.sin(2 * np.pi * hz * T) for hz, db in FRIDGE_LINES)
    sway_db = 1.5 * walk(5)
    moving = low + (nominal_scale(lift_db) - 1) * colour(low, band(160, 800))
    moving = nominal_scale(level_db - 5.5 + sway_db) * moving
    pan = nominal_scale(np.array([[-0.5], [0.5]]) / 2)
    return (moving + nominal_scale(-65.5) * (tone - low) + lines) * pan


def scene():
    motor = mixer()
    hits = spoon() + switch() + hook() + dough()
    offset = nominal_scale(over_hz(PORT_BALANCE) / 2) * np.exp(.5j * over_hz(PORT_PHASE))
    direct = colour(nominal_scale(0.5) * motor + hits, np.array([offset, 1 / offset]))
    return direct + kitchen(nominal_scale(6.0) * motor.mean(axis=0) + nominal_scale(3.0) * hits) + room_tone()


def low_pass(x):
    return signal.sosfilt(signal.butter(12, 16660, fs=SR, output="sos"), x)


def record(dry):
    mix = colour(dry, nominal_scale(over_hz(MICROPHONE)) * band(34, 21000))
    mix = np.tanh(mix / 1.2) * 1.2
    for s, fade in SCENE_CHANGES:
        mix = mix * np.where(T < s, 1, np.clip((T - s) / fade, 0, 1))
    return low_pass(mix)


dry = scene()
out = record(dry)
int16_out(out)
```